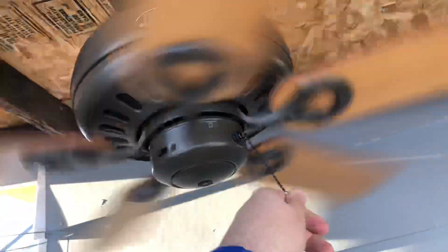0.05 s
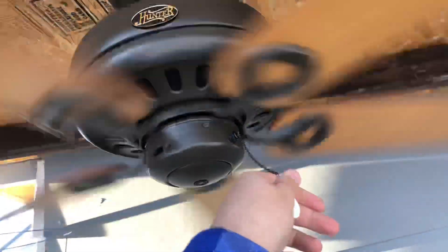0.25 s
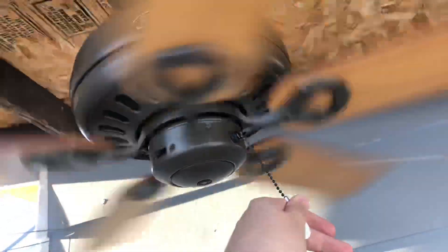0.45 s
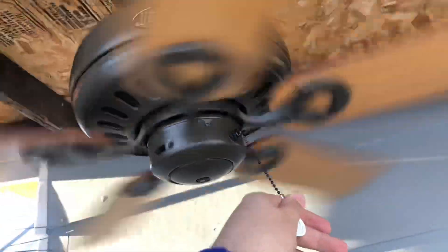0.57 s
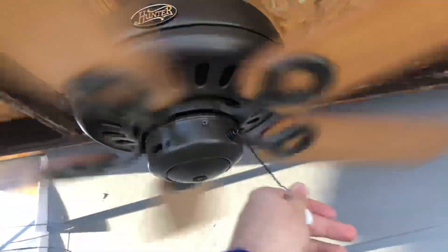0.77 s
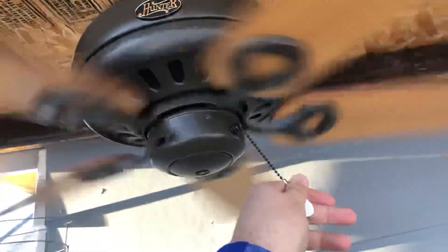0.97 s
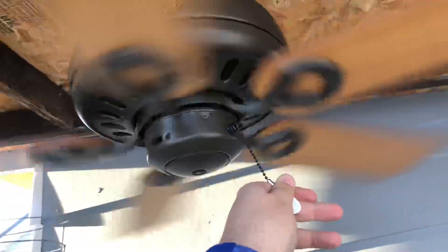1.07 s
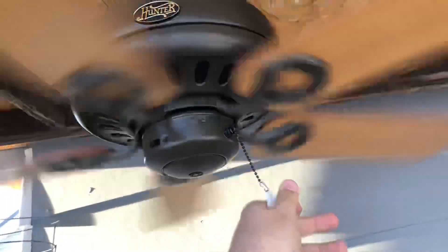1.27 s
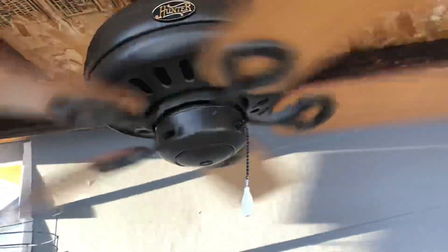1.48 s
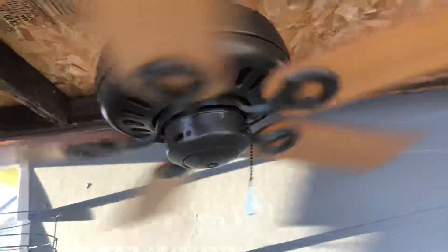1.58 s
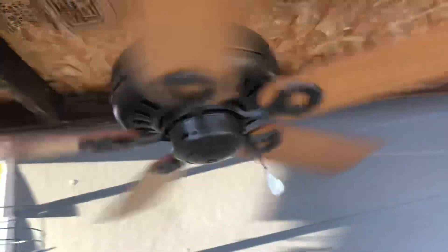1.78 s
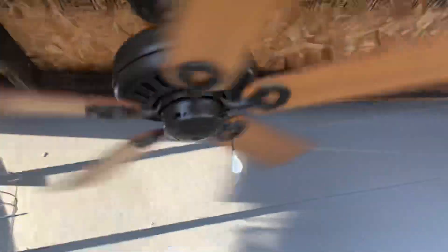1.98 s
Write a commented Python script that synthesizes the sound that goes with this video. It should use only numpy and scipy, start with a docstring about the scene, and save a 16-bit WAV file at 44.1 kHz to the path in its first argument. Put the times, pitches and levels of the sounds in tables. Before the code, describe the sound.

A ceiling fan's pull-chain switch clicks and snaps in several tugs, very close, over low buffeting draught and soft blade rush under an open roof; then the released chain ticks faintly.

```python
"""Under an open roof, a hand tugs the bead chain of a running ceiling fan.
The switch ratchets and snaps: random knocks ring its small parts and the metal housing, with dry cracks.
The fan's draught buffets the microphone with lumpy low noise and soft thuds of a few cycles.
Shaped steady noise makes the rush of the blades and the outdoor air; the freed chain ticks faintly.
Far birds peep in thin gliding tones, and near the end there is a brief grainy rustle."""
import sys
import numpy as np
from scipy import signal
from scipy.fft import irfft
from scipy.io import wavfile
from scipy.ndimage import uniform_filter1d

SR = 44100
rng = np.random.default_rng(int(sys.argv[2]) if len(sys.argv) > 2 else 0)


def magnitude_from_level(level_db):
    """Linear magnitude for a level in decibels (20 dB per decade)."""
    exponent = np.asarray(level_db, float) / 20
    return 10 ** exponent


def digitize_waveform(pressure):
    """Quantize a signal to 16-bit integers and store it at the path in sys.argv[1].

    Rows of a 2-D input are taken as channels; values are limited to [-1, 1].
    """
    field = np.atleast_2d(pressure).T
    bounded = np.clip(field, -1, 1)
    quanta = np.round(bounded * 32767).astype(np.int16)
    wavfile.write(sys.argv[1], SR, quanta)


N = 89743  # length of the scene in samples


def evened(x):
    """Scales a sound to an rms of 1."""
    return x / np.sqrt(np.mean(x ** 2) + 1e-20)


def read_curve(points, hz):
    """Reads a level curve in dB between its points, along a logarithmic frequency scale."""
    f, db = np.transpose(points)
    return np.interp(np.log(hz + 1), np.log(f + 1), db)


def add(mix, start_s, sound):
    """Adds a sound to the mix in place, cutting what runs past the end."""
    start = round(start_s * SR)
    part = mix[start:start + len(sound)]
    part += sound[:len(part)]


def patchy_noise(curve, patch_db):
    """Noise built from random short-time spectra: a fixed colour with random louder and softer patches."""
    size, hop = 1024, 256
    frames = N // hop + 5
    hz = np.fft.rfftfreq(size, 1 / SR)[:, None]
    real, imaginary, patches = rng.standard_normal((frames, size // 2 + 1, 3)).T
    patches = uniform_filter1d(patches, size=6, axis=0)  # smooth over frequency
    patches = evened(uniform_filter1d(patches, size=6, axis=1))  # and over time
    spectra = (real + 1j * imaginary) * magnitude_from_level(read_curve(curve, hz) + patch_db * patches)
    sound = signal.istft(spectra, nperseg=size, noverlap=size - hop)[1]
    return evened(sound[:N])


# colour of the blades and outdoor air: (f/Hz, relative level/dB per Hz)
AIR_COLOUR = [(88, -35), (150, -5), (198, -12), (265, -5), (356, -2), (606, -13.5), (783, -10.5),
              (1070, -15), (8970, -39), (16500, -61.5)]


def air():
    """The rush of the blades and the outdoor air: noise of a steady overall level and colour."""
    return magnitude_from_level(-48) * patchy_noise(AIR_COLOUR, patch_db=1.3)


# rise and fall of the buffeting: (t/s, level/dB before the trim)
DRAUGHT_LEVEL = [(0, -34.5), (.04, -30.5), (.075, -30.5), (.125, -37.5), (0.142, -27.5), (0.199, -26.5),
                 (.225, -37), (.36, -37.5), (.41, -32.5), (.56, -38), (.6, -36.5), (.74, -38.5), (.8, -34),
                 (.9, -39), (1.2, -38), (1.4, -41.5), (1.7, -40.5), (1.76, -36.5), (1.82, -43.5),
                 (1.94, -36.5), (2.03, -45)]
# colour of the buffeting before it brightens: (f/Hz, relative level/dB per Hz)
DRAUGHT_COLOUR = [(15, -27), (25, 5.5), (64, -1.5), (179, -2), (332, -10.5), (510, -15.5), (605, -14),
                  (1500, -32), (1950, -63)]


def draught():
    """Lumpy low noise whose level follows the draught; stronger gusts are slightly brighter."""
    trim_db = -0.5
    brighten = 0.032  # dB more treble for each dB of draught
    t, db = np.transpose(DRAUGHT_LEVEL)
    level_db = np.interp(np.arange(N) / SR, t, db)
    buffeting = patchy_noise(DRAUGHT_COLOUR, patch_db=2.5)
    low_pass = signal.butter(1, 300, fs=SR, output="sos")
    treble = buffeting - signal.sosfiltfilt(low_pass, buffeting)
    treble_gain = magnitude_from_level(brighten * (level_db + 49))
    return magnitude_from_level(level_db + trim_db) * (buffeting + (treble_gain - 1) * treble)


def eddy(middle_s, db, hz, cycles):
    """A soft thud: a few cycles of a low tone that swell and die away. Returns its start and sound."""
    half_s = 2 * cycles / hz
    t = np.arange(max(-half_s, -middle_s), half_s, 1 / SR)  # seconds from the middle
    swell = np.exp(-abs(2.19 * t * hz / cycles) ** 3)
    fade_in = np.minimum((t - t[0]) / .002, 1)
    tone = np.cos(2 * np.pi * (hz * t + rng.random()))
    return middle_s + t[0], magnitude_from_level(db) * swell * fade_in * tone


# single eddies that strike the microphone: (t/s of the middle, peak level/dB, f/Hz, rough length/cycles)
EDDY_LIST = [(.008, -18.5, 254, 1), (0.057, -19, 97, 1.6), (.059, -20, 400, 1.24),
             (0.1379, -10.5, 241, 1.54), (.149, -20.5, 423, 2.7), (0.153, -21, 95, 1.4),
             (.160, -14.5, 667, 1.93), (0.165, -16, 150, 1.5), (0.1736, -12, 420, 1.5),
             (.185, -20, 327, 1.45), (.201, -33, 303, 1), (0.212, -27.5, 107, 0.85), (0.4, -24, 112, 0.73),
             (0.414, -27.5, 300, 1.2), (0.475, -24, 181, 2.17), (.537, -29, 399, 1.9),
             (0.555, -24.5, 158, 1.44), (.473, -29.5, 475, 1.9), (.787, -26, 237, 1.54),
             (0.938, -25, 245, 1.4), (0.947, -23.5, 170, 0.94), (1.061, -27.5, 99.5, 1.24),
             (1.197, -29, 170, 1.1), (1.75, -28, 147, 1.23), (1.778, -29.5, 118, 0.76),
             (1.855, -28.5, 158, 1.2), (1.941, -26.5, 224, 1.26)]


def eddies():
    """All the eddies that thud against the microphone."""
    track = np.zeros(N)
    for row in EDDY_LIST:
        add(track, *eddy(*row))
    return track


# what the switch and housing ring with, before random spread:
# (f/Hz, relative level/dB, longest time/s to fall by 60 dB)
RING_MODES = [(960, -2, 0.0087), (1185, -2.5, 0.031), (1619.5, 3.5, 0.04), (2640, -8.5, .03),
              (3400, -5, 0.017), (3920, -0.5, 0.023), (5070, 4, 0.014), (5780, -0.5, .015),
              (6850, -14, 0.012), (7600, -1, .012), (8570, -7, .01), (10450, -2, .008),
              (11340, -10.5, .006), (14500, -7, .005)]
# colour of the dry crack before its tilt: (f/Hz, relative level/dB per Hz)
CRACK_COLOUR = [(880, -6), (1500, 0.5), (2240, -12), (3600, -1.5), (6490, 6), (8420, 5.5), (11500, -3),
                (16500, -14)]
HOUSING_HZ = 2000  # rings below this belong to the housing, those above to the small parts
TILT_HZ = 4940  # the tilt turns about this frequency
CLICK_SAMPLES = 4096


def knock_trains(hz):
    """A first knock, a short chatter and a fading rattle, drawn for each ring and, last, for the crack."""
    knocks_per_s, spread_db, chatter_s = 5000, 6, .003
    rattle_db, rattle_t60_s = -24.5, 0.18
    housing_chatter = .35
    t = np.arange(CLICK_SAMPLES) / SR
    chance, strength, sign = rng.random((3, len(hz) + 1, CLICK_SAMPLES))
    knocks = (chance < knocks_per_s / SR) * magnitude_from_level(spread_db * np.log(strength)) * np.sign(sign - .5)
    # the beads keep jostling: this rattle is shared by all
    rattle = knocks[-1] * magnitude_from_level(rattle_db - 60 * t / rattle_t60_s)
    knocks *= np.exp(-(t / chatter_s) ** 2)
    knocks[:-1] += housing_chatter * rattle  # the light beads stir the rings less than the crack
    knocks[-1] += rattle
    knocks[:-1] *= np.where(hz < HOUSING_HZ, housing_chatter, 1)  # the housing favours the first knock
    knocks[:, 0] = 1
    return knocks


def ring_modes(tilt_db, housing_db):
    """Fading sine tones of the switch parts and the housing; the small parts vary at random."""
    spread_db, detune, longest_cycles = 1.5, .012, 60
    t = np.arange(CLICK_SAMPLES) / SR
    hz, db, t60_s = np.transpose(RING_MODES)[:, :, None]
    small = hz > HOUSING_HZ
    level_draw, pitch_draw = rng.standard_normal((2, *hz.shape))
    db = db + spread_db * level_draw * small
    db = db + np.where(hz < HOUSING_HZ, housing_db, tilt_db * np.log2(hz / TILT_HZ))
    fade = magnitude_from_level(db - 60 * t / np.minimum(t60_s, longest_cycles / hz))
    return fade * np.sin(2 * np.pi * hz * (1 + detune * pitch_draw * small) * t)


def dry_crack(tilt_db):
    """A bare tick with the colour of the plastic, fading by 60 dB in 10 ms."""
    t = np.arange(CLICK_SAMPLES) / SR
    hz = np.fft.rfftfreq(CLICK_SAMPLES, 1 / SR)
    tilt = tilt_db * np.log2(np.maximum(hz, HOUSING_HZ) / TILT_HZ)
    tick = irfft(magnitude_from_level(read_curve(CRACK_COLOUR, hz) + tilt))
    return np.roll(tick, shift=40) * magnitude_from_level(-60 * t / 0.01)  # shifted to keep the half before its peak


def click(start_s, db, tilt_db, housing_db):
    """Knocks set off the rings and the dry crack. Returns the start and the sound."""
    crack_db = 3  # against all the rings together
    rings = ring_modes(tilt_db, housing_db)
    crack = dry_crack(tilt_db)
    rings = rings / np.linalg.norm(rings)
    crack = magnitude_from_level(crack_db) * crack / np.linalg.norm(crack)
    body = np.vstack([rings, crack])
    hz = np.transpose(RING_MODES)[0][:, None]
    parts = signal.fftconvolve(knock_trains(hz), body, axes=1)
    # each part keeps its share of the energy
    share = np.linalg.norm(body, axis=1) / np.linalg.norm(parts, axis=1)
    sound = share @ parts
    loudest = np.sqrt(uniform_filter1d(sound ** 2, size=88).max())  # rms of the loudest 2 ms
    return start_s, magnitude_from_level(db) * sound / (2 * loudest)


# ticks and snaps of the switch: (t/s, level/dB, 6 dB above the rms of the loudest 2 ms,
# treble tilt/dB per octave, relative level/dB passed on to the housing)
SWITCH_CLICKS = [(0.0635, -42.5, 3, -6), (0.0968, -32.5, 3, -10), (0.1111, -23.5, -4.5, 3),
                 (0.1138, -28.5, 11, 18), (0.1305, -31.5, -9, -28), (0.3314, -36.5, -4.5, -18),
                 (.352, -29.5, -4.5, -27), (0.3707, -28.5, -7, -5), (0.3756, -22.5, 7, 0),
                 (0.3842, -29.5, -11, -21), (0.41, -40.5, -6, -21), (.612, -47, 8, -16), (.654, -37, 3, -6),
                 (0.6721, -19.5, 2.5, -3.5), (0.6739, -23.5, -3, -10), (0.6918, -30.5, -6, 7),
                 (0.7803, -30.5, -3.5, -5), (0.7954, -27.5, -5.5, -31), (0.8106, -31, -5, -18),
                 (0.8161, -23, -4.5, -4.5), (.95, -44.5, 5, -18), (1.001, -39.5, 3, -18),
                 (1.0339, -20.5, -1, -0.5), (1.079, -37, -13.5, -13), (1.64, -50.5, -2, -14)]


def switch_clicks():
    """The switch ratchets and snaps under the tugs."""
    track = np.zeros(N)
    for row in SWITCH_CLICKS:
        add(track, *click(*row))
    return track


def roof(x):
    """A short dull wash of reflections from roof and wall: fading low-passed noise as an echo."""
    t60_s, treble_hz = 0.1, 7700
    t = np.arange(SR // 3) / SR
    tail = rng.standard_normal(len(t)) * magnitude_from_level(-60 * t / t60_s) * (t > .003)
    tail = signal.lfilter(*signal.butter(1, treble_hz, fs=SR), tail)
    return magnitude_from_level(-10) * signal.fftconvolve(x, tail / np.linalg.norm(tail))[:N]


def swinging_chain():
    """The freed chain swings and its beads tick faintly, ever more densely towards the end."""
    from_s, ticks, least_db, spread_db = 1.5, 150, -65, 1.7
    track = np.zeros(N)
    for when, strength in rng.random((ticks, 2)):
        start_s = from_s + np.sqrt(when) * (N / SR - from_s)
        db = least_db - spread_db * np.log(strength)  # the logarithm is negative, so this adds level
        add(track, *click(start_s, db, tilt_db=0.92, housing_db=-22))
    return track


def peep(start_s, length_s, db, from_hz, to_hz):
    """A thin whistle that glides in pitch, swelling and fading. Returns its start and sound."""
    u = np.arange(0, 1, 1 / (length_s * SR))
    hz = from_hz + (to_hz - from_hz) * u
    return start_s, magnitude_from_level(db) * np.sin(np.pi * u) * np.sin(2 * np.pi * np.cumsum(hz) / SR)


# peeps of far birds: (t/s, length/s, peak level/dB, f/Hz at the start, f/Hz at the end)
PEEP_LIST = [(1.54, 0.013, -63.5, 9650, 9600), (1.829, 0.045, -65, 6270, 7200)]


def birds():
    """Far birds peep."""
    track = np.zeros(N)
    for row in PEEP_LIST:
        add(track, *peep(*row))
    return track


def rustle():
    """A brief grainy rustle: cubed noise, which is spiky, in a middle band. Returns its start and sound."""
    start_s, length_s, db, low_hz, high_hz = 1.912, 0.05, -51, 1180, 5040
    u = np.arange(0, 1, 1 / (length_s * SR))
    band = signal.butter(3, [low_hz, high_hz], "band", fs=SR, output="sos")
    grains = evened(signal.sosfilt(band, rng.standard_normal(len(u)) ** 3))
    return start_s, magnitude_from_level(db) * np.sin(np.pi * u) * grains


def scene():
    """Adds up all the sounds; only the switch and chain get the wash of the roof."""
    rush = air() + draught() + eddies()
    switch = switch_clicks() + swinging_chain()
    mix = rush + switch + roof(switch) + birds()
    add(mix, *rustle())
    return mix[None]


def top_cut(x):
    """Nothing passes above the cut-off."""
    return signal.sosfilt(signal.butter(12, 16760, fs=SR, output="sos"), x)


def record(dry):
    """The microphone cuts the lows under 50 Hz, and a steep filter takes off the top treble."""
    low_cut = signal.butter(3, 50, "high", fs=SR, output="sos")
    band_limit = signal.cheby2(12, 50, 16536, fs=SR, output="sos")  # 50 dB down from 16536 Hz up
    mix = signal.sosfilt(band_limit, signal.sosfilt(low_cut, dry))
    return top_cut(mix)


dry = scene()
out = record(dry)
digitize_waveform(out)
```